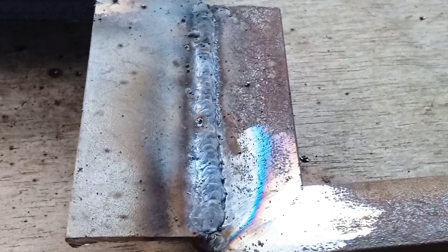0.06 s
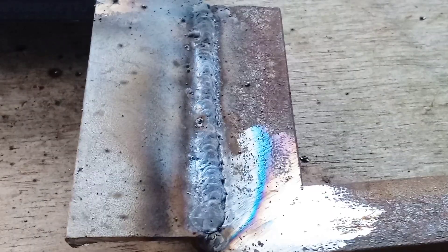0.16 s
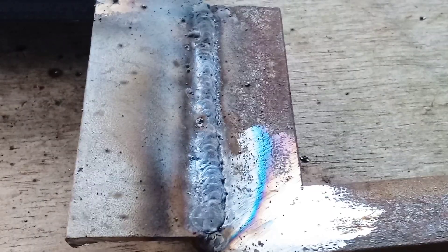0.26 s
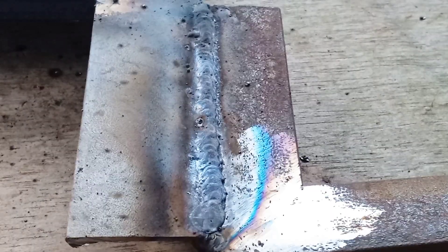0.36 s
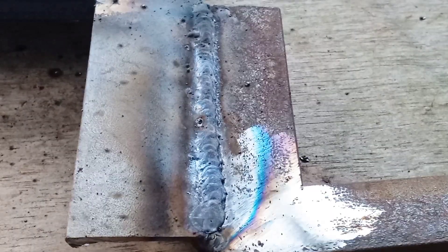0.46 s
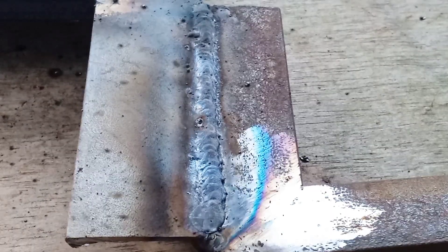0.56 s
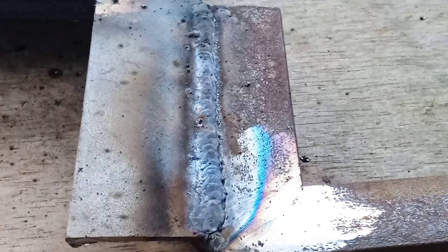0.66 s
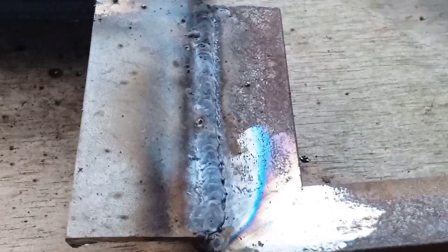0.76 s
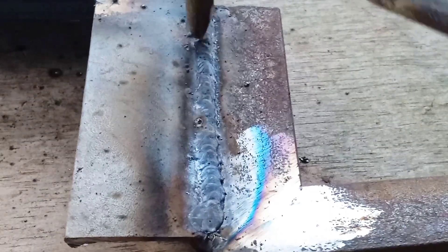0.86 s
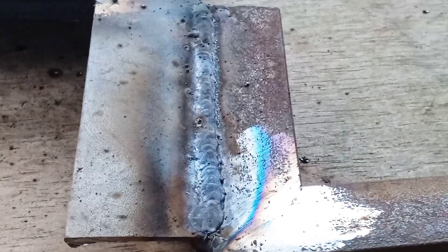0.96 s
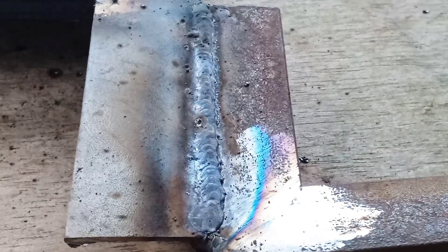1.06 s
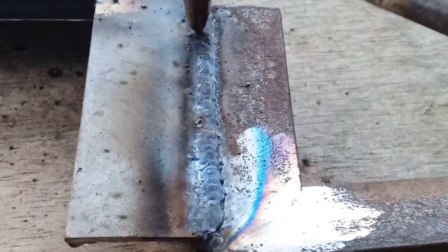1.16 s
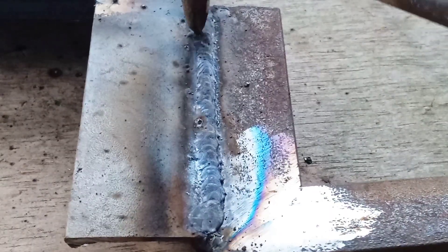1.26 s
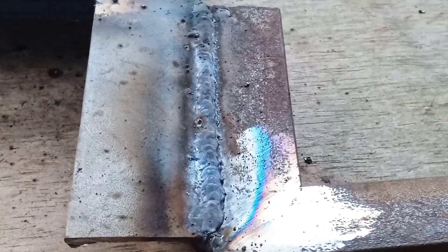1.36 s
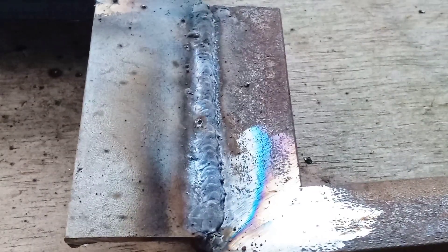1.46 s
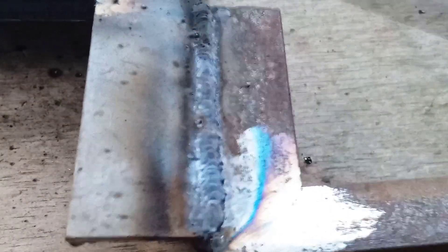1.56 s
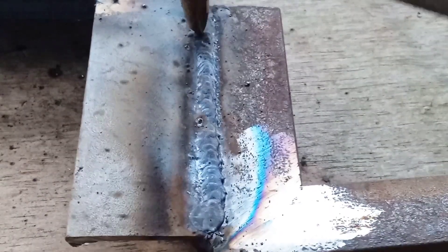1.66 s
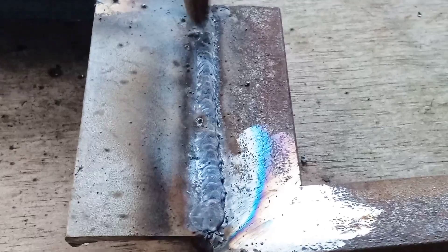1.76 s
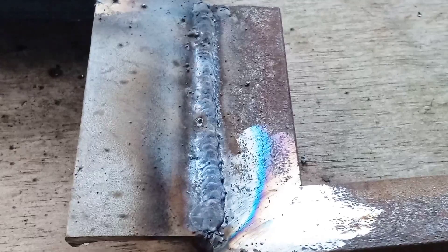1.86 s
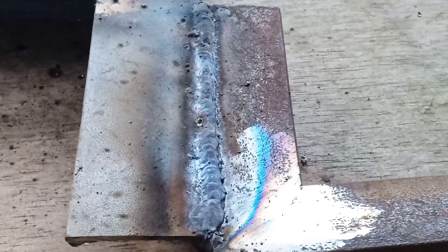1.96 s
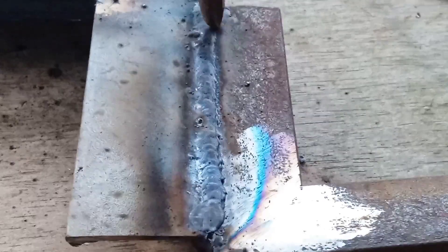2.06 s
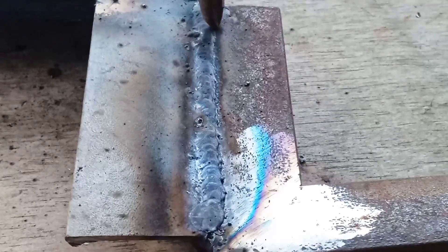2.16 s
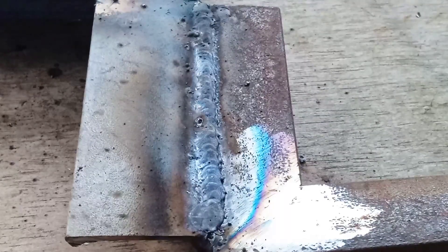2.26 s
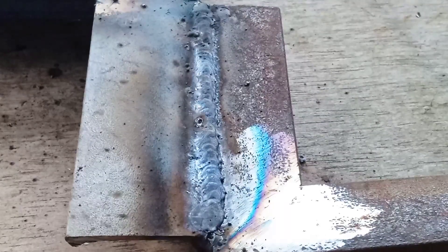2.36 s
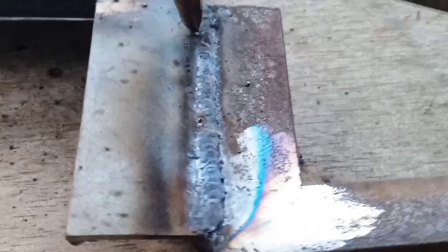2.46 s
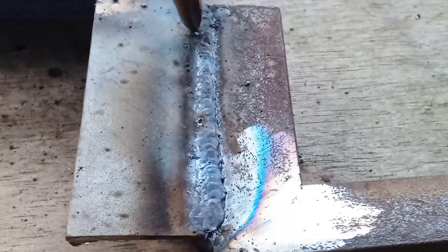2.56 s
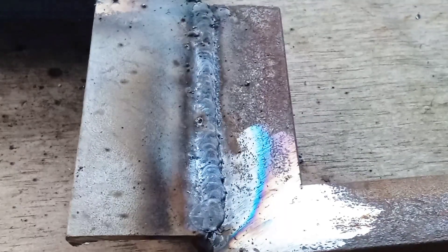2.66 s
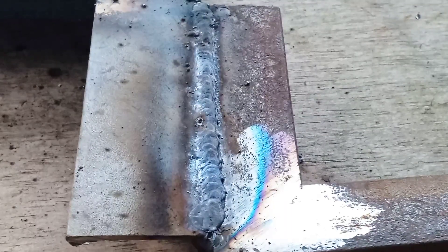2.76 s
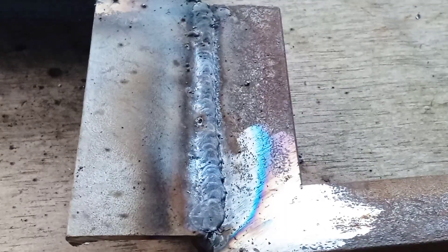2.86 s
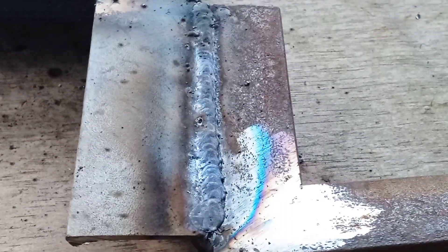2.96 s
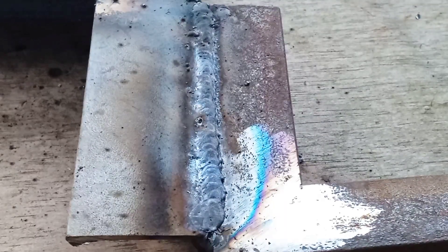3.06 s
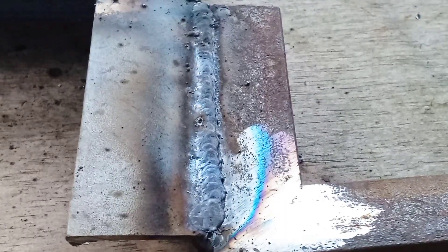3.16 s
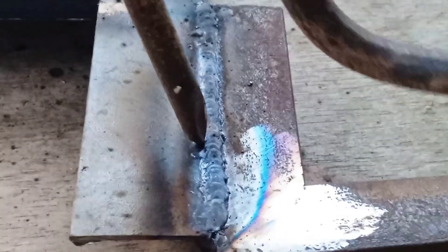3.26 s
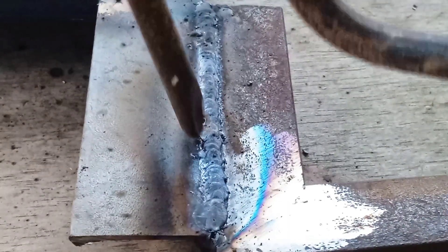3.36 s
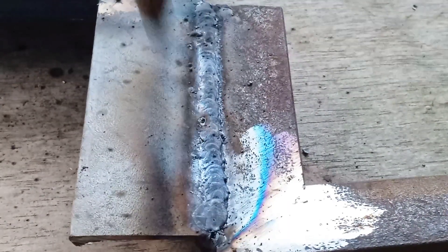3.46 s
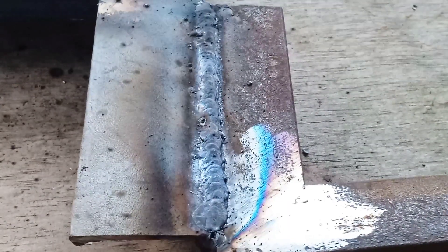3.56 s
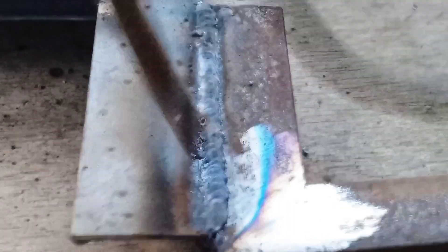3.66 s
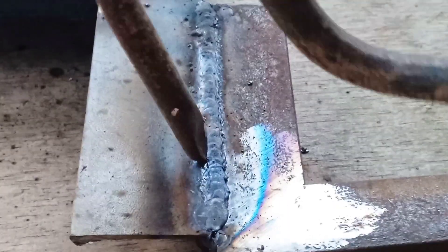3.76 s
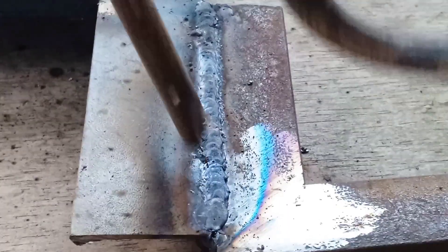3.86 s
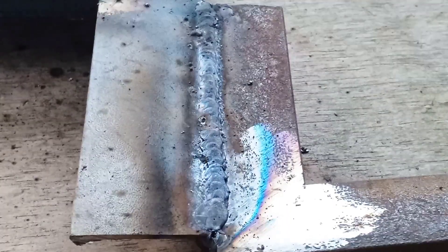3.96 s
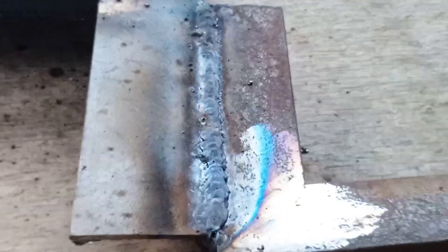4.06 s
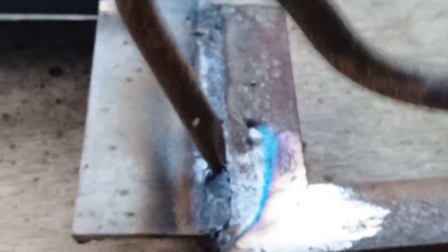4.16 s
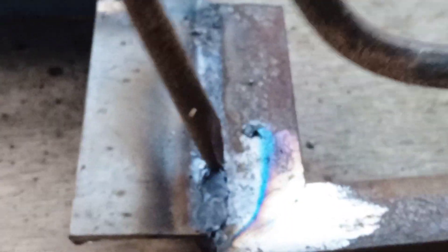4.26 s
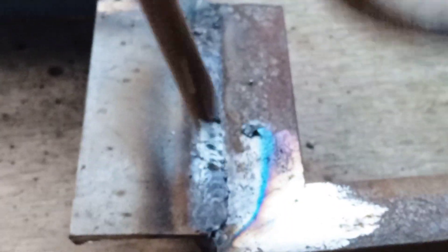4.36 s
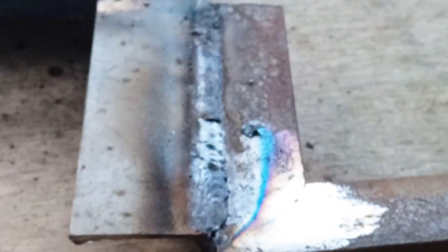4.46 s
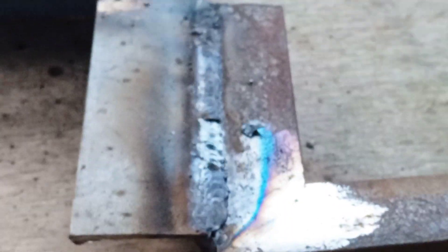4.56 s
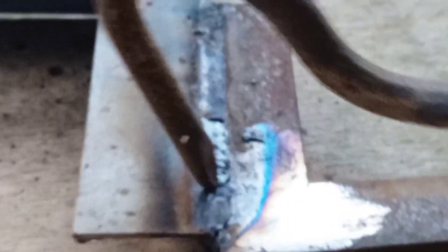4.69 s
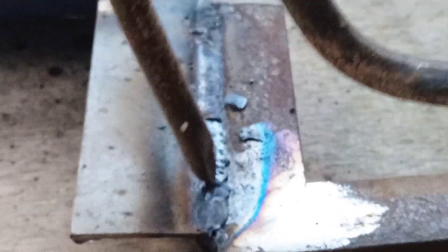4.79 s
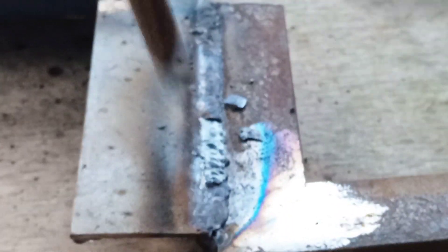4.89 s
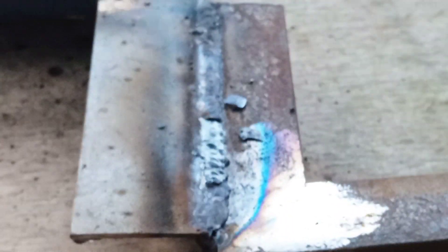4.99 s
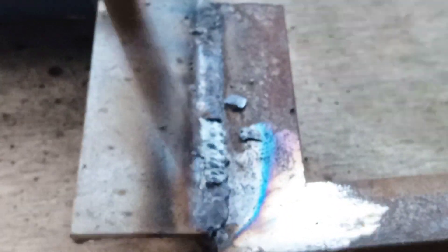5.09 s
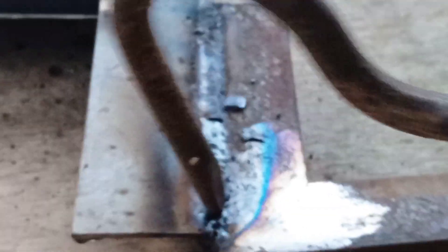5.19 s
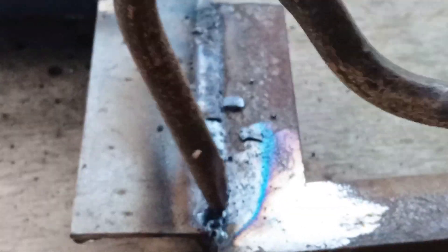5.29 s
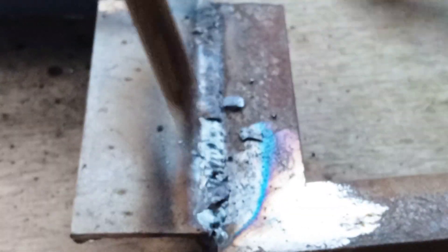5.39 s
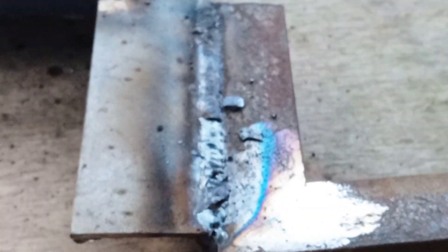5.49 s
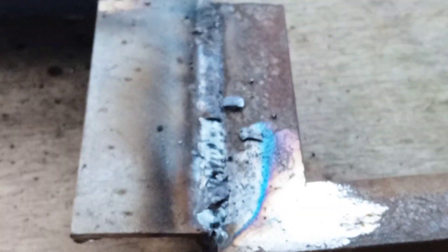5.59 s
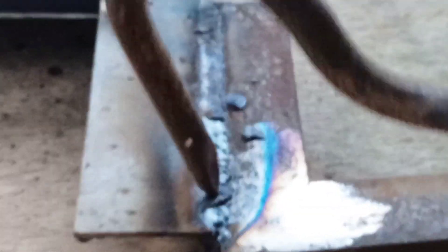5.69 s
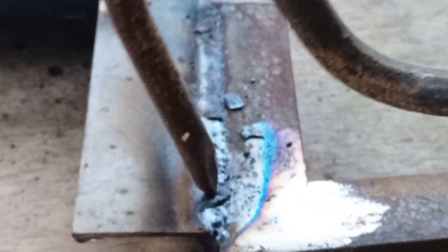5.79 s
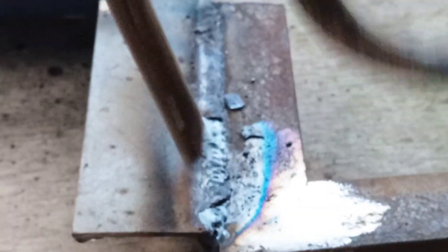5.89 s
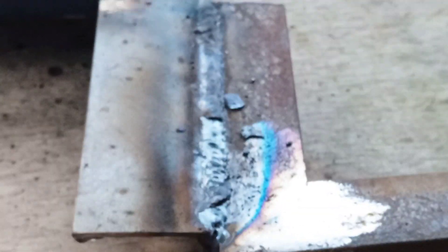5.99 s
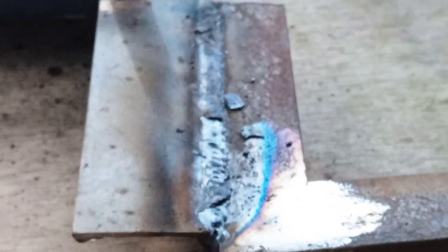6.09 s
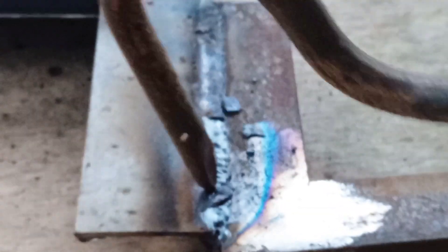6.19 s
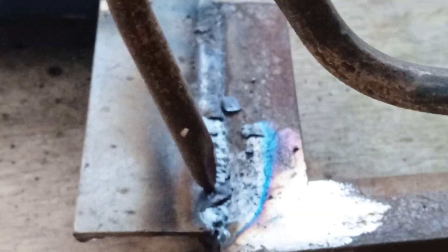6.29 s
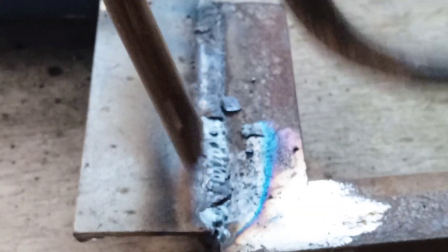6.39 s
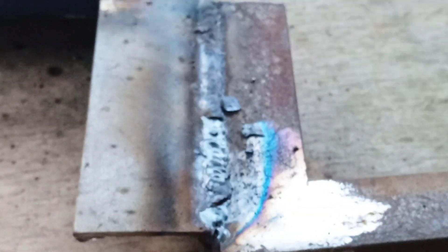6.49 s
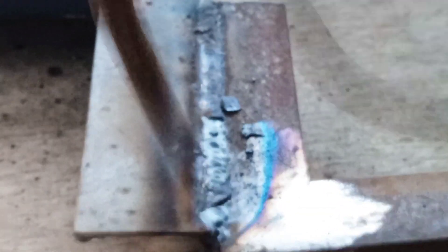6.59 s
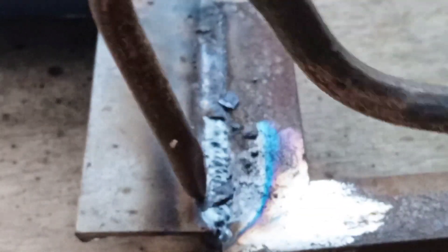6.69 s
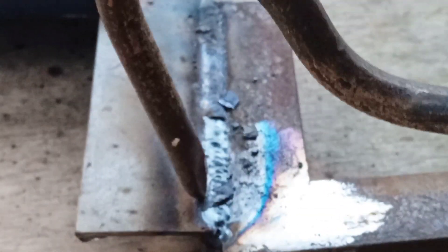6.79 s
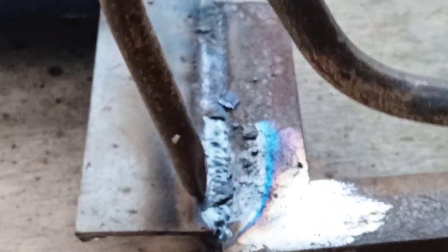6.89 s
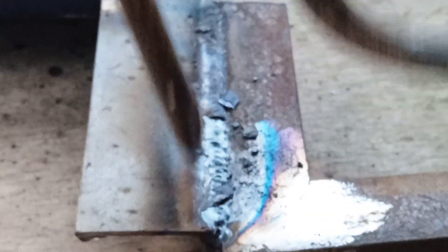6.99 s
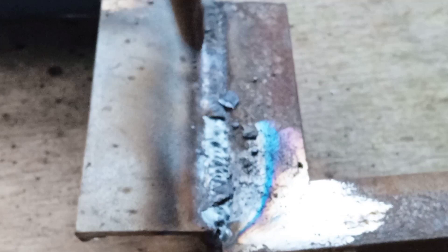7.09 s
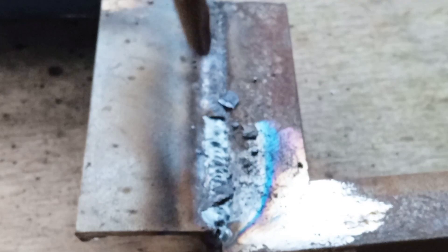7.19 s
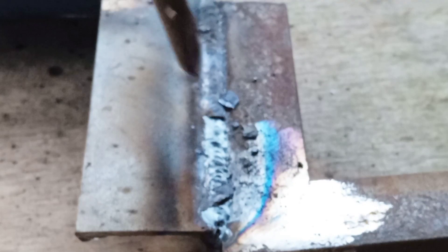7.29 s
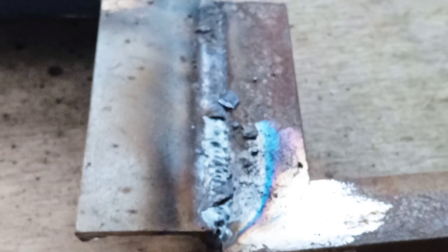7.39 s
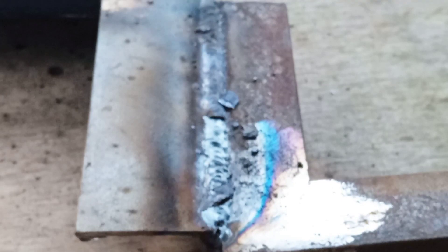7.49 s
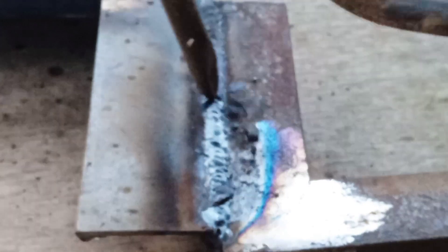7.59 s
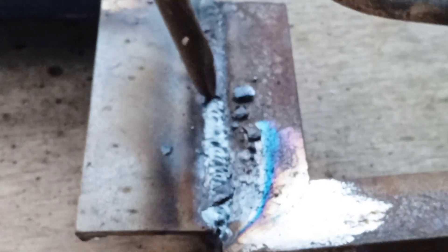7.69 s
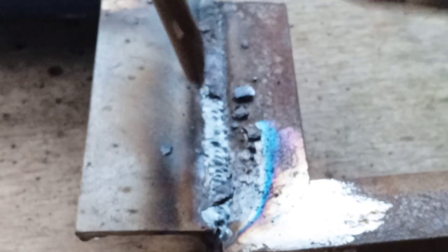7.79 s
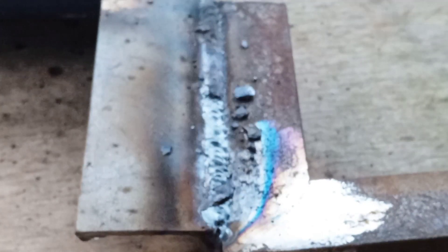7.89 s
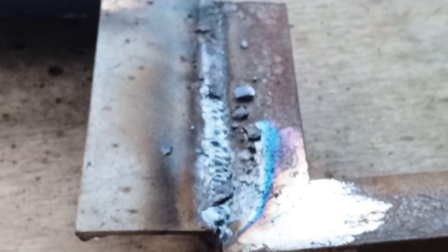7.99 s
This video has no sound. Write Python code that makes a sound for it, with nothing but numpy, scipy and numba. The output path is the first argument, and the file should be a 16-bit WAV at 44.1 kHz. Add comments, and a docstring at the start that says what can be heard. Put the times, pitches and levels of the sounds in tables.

```python
"""A workshop hums and hisses, with a faint far whine and the odd tick of a falling slag chip; then a hammer strikes.
A chipping hammer knocks slag off a weld on a steel plate that lies on a wooden bench, close to the microphone.
Each blow sums a noise crack, decaying modes of steel, hammer and bench, and a wash of crowded modes;
the spot struck sets the strength and decay of the main modes. Air is shaped noise, the hum drifting sines.
The recorder's gain control ducks each blow and lets its ring swell back."""
import sys
import numpy as np
from scipy import signal
from scipy.fft import rfft, irfft
from scipy.io import wavfile
from scipy.ndimage import uniform_filter1d, map_coordinates
from numba import njit

SR = 44100
rng = np.random.default_rng(int(sys.argv[2]) if len(sys.argv) > 2 else 0)


def transcribe(signal):
    """Save signal, clipped to [-1, 1], as a 16-bit WAV file at the path in sys.argv[1]."""
    frames = np.atleast_2d(signal).T
    limited = np.clip(frames, -1, 1)
    pcm = np.round(limited * 32767).astype(np.int16)
    wavfile.write(sys.argv[1], SR, pcm)


N = 354563

# Spectrum of workshop air and microphone hiss. Each row: frequency in Hz, relative density in dB per Hz.
AIR_SPECTRUM = [(25, -64), (55, -16), (120, -7), (330, -6.5), (520, -2), (700, -6.5), (1100, -7),
                (1400, -14.5), (1700, -10), (3600, -22), (7000, -22), (8500, -33.5), (13500, -40.5),
                (15200, -30)]
# Drifting tones of the workshop: low hum of a machine, and faint upper resonances of plate or room.
# Each row: frequency in Hz, level in dB before wavering, width (rate of drift) in Hz.
WORKSHOP_TONES = [(121, -71, 6), (158.4, -70, 17), (564.3, -61.5, 6), (1180, -72.5, 9.6), (1634, -69.5, 12)]
# Low drone of the machine. Each row: time in seconds, level in dB before the drone gain.
DRONE_LEVELS = [(0.0, -68), (1.48, -72), (1.81, -64.5), (3.78, -77), (4.7, -64), (5.06, -75), (6.31, -59),
                (6.79, -66.5), (7.54, -59), (8.04, -64.5)]
# Far whines. Each row: start in seconds, length in seconds, pitch in Hz, end pitch in Hz, level in dB;
# the pitch and level also waver.
FAR_WHINES = [(0, 0.453, 725, 690, -55), (0.739, 0.25, 645, 665, -54), (3.712, 0.47, 662, 635, -53),
              (4.331, 0.77, 554, 524, -58.5), (4.879, 0.317, 534, 565, -56.5),
              (6.456, .14, 1290, 1302, -61.5), (6.859, 0.13, 1005, 1050, -58.5)]

# Slag chips landing. Each row: time in seconds, level in dB.
CHIP_LANDINGS = [(.043, -54), (3.957, -55), (4.051, -47), (4.528, -59), (4.865, -35), (5.149, -60),
                 (5.228, -49), (5.2446, -30), (7.428, -60)]
# Spectrum of a chip's tick. Each row: frequency in Hz, relative density in dB per Hz.
CHIP_SPECTRUM = [(500, -8), (1500, -14), (4000, -10), (7000, 9), (12500, 3.5), (15500, 22.5)]

# Hammer blows. Each row: time in seconds, force in dB, spot along the weld (0 far end to 1 near end), then
# relative to the force: hammer ring in dB, high ping in dB, slag crack in dB, bench knock in dB.
HAMMER_BLOWS = [ (0.4142, -6.5, .24, 7.5, 9, -8, -6.5), (0.7742, -4.5, 0.15, 7.5, -9, -3, -0.5),
                (1.2091, -4.5, 0.14, 6, -4.5, -7, 4.5), (1.653, -1.5, 0.25, 0.5, 6, 2.5, -2.5),
                (2.091, 1.5, 0.089, 5.5, -5, 2, -1), (2.8289, .5, 0.4, 2, 1.5, 4.5, 1),
                (3.3079, -1, 0.54, -3, 4, 5.5, 2), (3.766, -1.5, .62, -12.5, -13, -1, -1.5),
                (4.281, 2, 0.67, -8.5, -2, -11, -1), (4.7728, -1.5, 0.83, -17.5, 3, 0, 2),
                (5.2865, 3, 0.79, 0, 6, 6, 0.5), (5.7609, 4, 0.87, -20, -20, -14, -3.5),
                (6.2526, 0.5, 0.84, 4.5, 2.5, -4, -1), (7.2245, 0, 0.44, -18, -22, -6.5, -3),
                (7.748, 1, 0.47, 0, 5.5, 1, 4)]
# Spectrum of the first crack of the contact. Each row: frequency in Hz, relative density in dB per Hz.
CRACK_SPECTRUM = [(40, -9.5), (300, -20), (500, -35), (900, -10), (1250, -1.5), (1700, 2.5), (2200, -5.5),
                  (3500, -1), (4500, -4), (6500, 1), (8000, -14), (13000, -26), (15500, -5.5)]
# Crowded weak modes and their wash in the workshop. Each row: frequency in Hz, relative density in dB per Hz,
# t60 in seconds.
CLANG_SPECTRUM = [(100, -19, .3), (190, -6, .3), (350, -19, .3), (800, -11, .25), (1200, -1, .24),
                  (2200, 0, .27), (2800, -11, .28), (3600, -19, .28), (4500, -7, .3), (5500, -14, .27),
                  (6700, -10, .26), (7700, -20, .22), (13000, -29, .2), (15500, -22, .21)]
# Other clear modes of plate and hammer. Each row: frequency in Hz, level in dB before scatter and colour,
# t60 in seconds.
STEEL_MODES = [(1235, -29, .24), (1624, -20.5, .22), (1806, -30, .25), (1930, -26, .24), (1962, -27, .23),
               (2154, -25, .24), (2172, -42, .6), (2897, -27, .24), (4005, -34, .29), (4300, -36, .28),
               (4346, -32, .29), (4398, -31, .3), (4522, -35, .33), (4828, -31.5, .3), (4883, -34, .27),
               (5101, -32, .21), (5852, -33, .38), (6234, -27, .29), (6818, -30, .24), (7539, -37, .22),
               (7747, -36, .25), (8018, -39, .21), (8253, -35, .2), (8751, -36, .19), (9390, -42, .2),
               (10344, -44, .23), (10880, -41, .21), (11116, -40, .22), (11310, -37, .21)]
# Plate modes that the bench damps at once, and the bench's own. Each row: frequency in Hz, level in dB before
# colour, t60 in seconds.
KNOCK_MODES = [(120, -29.5, 0.078), (148, -24, 0.05), (197, -23, 0.05), (769, -16, 0.022),
               (1246.7, -10.5, 0.078), (1945, -16.5, 0.068), (2120, -19.5, 0.072), (4357, -12.5, 0.056),
               (6407, -8, 0.034), (7370, -18.5, 0.098)]

# Band centres in Hz of a blow's deep thud, thump, knock, clang, clink, sparkle and slag crack.
BAND_CENTRES_HZ = [60, 170, 450, 1500, 4700, 9000, 14000]
# Deep thud, thump and knock of the bench. Each row: level in dB at mid weld, gain in dB from far to near end,
# growth in dB per dB of force.
BENCH_BANDS = [(-4, 7.5, 0.5), (-3.5, 5, 1.36), (-2, 5, 1.26)]

# Plate rings that change most with the spot struck; 2611 Hz has a second, better damped antinode near the
# near end. Each row: frequency in Hz, t60 in seconds at the sweet spot.
PLATE_RINGS = [(1135, .2), (2611, .56), (3121, .19), (2611, .33)]
# Where each plate ring speaks best. Each row: level in dB there, sweet spot along the weld, reach in weld
# lengths, loss in dB elsewhere, share of t60 lost elsewhere.
PLATE_SHAPES = [(-15.5, 0.596, 0.085, 6, 0.054), (-19, 0.12, 0.19, 12, 0.32), (-15.5, 0.39, 0.24, 14.5, 0),
                (-19, 0.87, 0.063, 23, 0)]
# High pings, one from the far half of the weld and one from the near half: columns as for PLATE_RINGS.
PING_RINGS = [(6080, .19), (6599, .25)]
# Where each ping speaks best: columns as for PLATE_SHAPES.
PING_SHAPES = [(-14, 0.4, 0.17, 13.6, 0), (-14.5, 0.62, 0.22, 9, .05)]
# Long rings of the hammer itself: columns as for PLATE_RINGS.
HAMMER_RINGS = [(4031, .6), (5435, .37)]
# Where each hammer ring speaks best: columns as for PLATE_SHAPES.
HAMMER_SHAPES = [(-33.5, 0.38, 0.16, 4, .2), (-19.5, 0.61, 0.18, 5.1, 0)]

AIR_DB, DRONE_GAIN_DB = -55, 2.5
CLANG_DB, CLINK_DB, SPARKLE_DB = -1.5, -2, -0.5  # middle, upper and treble bands of a full blow
CLINK_SHARE = 0.41  # dB of clink per dB of hammer ring
SPARKLE_SHARE = 0.24  # dB of sparkle per dB of slag crack
TOP_HZ = 15800  # upper band limit of the recorder
RING_T = np.arange(int(.9 * SR)) / SR  # time after an impact, in seconds


def undb(db):
    """Logarithmic level: decibels to amplitude gain."""
    return 10 ** (np.asarray(db) / 20)


def fade(t60):
    """Exponential free decay: 60 dB down after t60 seconds."""
    return np.exp(-np.log(1000) * RING_T / t60)


def across(hz, points_hz, values):
    """Interpolation of a curve on a log-frequency axis."""
    return np.interp(np.log(np.maximum(hz, 1)), np.log(points_hz), values)


def noise(points, size):
    """Spectral shaping: white noise filtered to a (Hz, dB) curve and scaled to rms 1."""
    hz, db = np.transpose(points)[:2]
    gain = undb(across(np.fft.rfftfreq(size, 1 / SR), hz, db))
    x = irfft(rfft(rng.standard_normal(size)) * gain, size)
    return x / x.std()


def walk(rate, size):
    """Slow random modulation: smooth chance of spread near 1 that changes rate times a second."""
    at = np.arange(size) / SR * rate
    knots = rng.standard_normal(int(at[-1]) + 3)
    return map_coordinates(knots, [at + rng.random()], order=2, mode="nearest")


def add(out, s, x):
    """Superposition: mix x in from time s, in seconds."""
    i = max(int(s * SR), 0)
    out[i:i + len(x)] += x[:max(N - i, 0)]


def room_air(swell_db=1):
    """Broadband noise: air and hiss with a gently swelling level."""
    return noise(AIR_SPECTRUM, N) * undb(AIR_DB + swell_db * walk(3.233, N))


def workshop_tones(waver_db=2):
    """Narrow-band tones: each sine drifts in strength and phase, which broadens its line."""
    t = np.arange(N) / SR
    out = np.zeros(N)
    for hz, db, width in WORKSHOP_TONES:
        amplitude = np.sqrt(2) * undb(db + waver_db * walk(width, N))
        out += amplitude * np.sin(2 * np.pi * hz * t + walk(2 * width, N))
    return out


def machine_drone(drone_hz=64, wobble_hz=1.21):
    """Frequency modulation: a low sine wobbles in pitch while its level rises and falls."""
    t = np.arange(N) / SR
    phase = 2 * np.pi * np.cumsum(drone_hz + wobble_hz * walk(13.0, N)) / SR
    level_db = DRONE_GAIN_DB + np.interp(t, *np.transpose(DRONE_LEVELS))
    return np.sqrt(2) * undb(level_db) * np.sin(phase)


def whine(length, hz, end_hz, waver=0.0094, flutter_db=2):
    """A gliding tone: a faint sine that swells, wavers in pitch and level, and fades."""
    size = int(length * SR)
    pitch = np.linspace(hz, end_hz, size) * (1 + waver * walk(28, size))
    swell = signal.windows.tukey(size, .4) * undb(flutter_db * walk(11.5, size))
    return swell * np.sin(2 * np.pi * np.cumsum(pitch) / SR)


def chip(tick_t60=0.022, tail_db=-17, tail_t60=0.074):
    """Brittle impact: a flake ticks on landing and the room answers with a weaker, longer decay."""
    return noise(CHIP_SPECTRUM, len(RING_T)) * (fade(tick_t60) + undb(tail_db) * fade(tail_t60))


def slag_crack(crack_db=-13, crack_t60=0.12):
    """Brittle fracture: the tip cracks the slag in a decaying noise burst."""
    return undb(crack_db) * noise(CRACK_SPECTRUM, len(RING_T)) * fade(crack_t60)


def mode_ripple():
    """Modal density: weak modes leave peaks and valleys, the same for every blow and deepest in the treble."""
    hz = np.fft.rfftfreq(len(RING_T), 1 / SR)
    depth_db = across(hz, [600, 1300, 7200, 8500], [2, 5, 6, 9])
    peaks = np.repeat(np.clip(rng.standard_normal(len(hz)), -2, 2), 12)[:len(hz)]
    power = undb(depth_db * peaks) ** 2
    return np.sqrt(power / uniform_filter1d(power, size=900))  # keeps the local mean power


def clang(ripple):
    """Frequency-dependent damping: modes too crowded to tell apart, each octave dying at its own pace."""
    size = len(RING_T)
    points_hz, _, t60 = np.transpose(CLANG_SPECTRUM)
    spectrum = rfft(noise(CLANG_SPECTRUM, size)) * ripple
    octave = np.round(np.log2(np.maximum(np.fft.rfftfreq(size, 1 / SR), 2 ** 6)))
    out = np.zeros(size)
    for k in np.unique(octave):
        band = irfft(spectrum * (octave == k), size)
        out += band * fade(across(2 ** k, points_hz, t60))
    return out


def ring(hz, t60, beat_rate=22, build_s=0.0066):
    """Damped mode: as reflections build up they beat against its direct sound."""
    knots = np.arange(64) / beat_rate
    in_phase, quadrature = (np.interp(RING_T, knots, c) for c in rng.standard_normal((2, len(knots))))
    room = .25 * (1 - np.exp(-RING_T / build_s))
    phase = (2 * np.pi * (hz * RING_T + rng.random())).astype(np.float32)
    return fade(t60) * ((1 + room * in_phase) * np.sin(phase) + room * quadrature * np.cos(phase))


def steel_ring(scatter_db=2.5):
    """Modal superposition: clear modes of plate and hammer, their levels scattered from blow to blow."""
    return sum(undb(db + scatter_db * rng.standard_normal()) * ring(hz, t60) for hz, db, t60 in STEEL_MODES)


def bench_knock(give_s=0.0025):
    """Inertia and damping: short modes that build up late, as the heavy plate takes a moment to move."""
    give = 1 - np.exp(-RING_T / give_s)
    return give * sum(undb(db) * ring(hz, t60) for hz, db, t60 in KNOCK_MODES)


def band_levels(force_db, spot, hammer_db, slag_db, bench_db):
    """Excitation spectrum: bench answers force and spot, clink follows hammer, the top is breaking slag."""
    bench = [db + bench_db + slope_db * (spot - .5) + growth * force_db for db, slope_db, growth in BENCH_BANDS]
    upper = [CLANG_DB, CLINK_DB + CLINK_SHARE * hammer_db, SPARKLE_DB + SPARKLE_SHARE * slag_db, slag_db]
    return bench + [force_db + db for db in upper]


def tint(x, colour_db):
    """Causality: a minimum-phase filter colours the blow, so nothing sounds before the contact."""
    size = 2 ** 16
    gain = undb(across(np.fft.rfftfreq(size, 1 / SR), BAND_CENTRES_HZ, colour_db))
    # folding the cepstrum onto positive times gives the minimum phase
    cepstrum = irfft(np.log(gain))
    cepstrum[1:size // 2] *= 2
    cepstrum[size // 2 + 1:] = 0
    return irfft(rfft(x, size) * np.exp(rfft(cepstrum)))[:len(x)]


def at_spot(modes, shapes, spot, strength_db):
    """Mode shape: (Hz, t60, dB) rows, full near their sweet spot, weaker and often shorter elsewhere."""
    struck = []
    for (hz, t60), (db, sweet_spot, reach, loss_db, damping) in zip(modes, shapes):
        missed = 1 - np.exp(-((spot - sweet_spot) / reach) ** 4)
        struck.append((hz, t60 * (1 - damping * missed), db + strength_db - loss_db * missed))
    return struck


def main_rings(force_db, spot, hammer_db, ping_db):
    """Selective excitation: the spot picks the modes; the hammer rings as freely as it rebounds."""
    return (at_spot(PLATE_RINGS, PLATE_SHAPES, spot, force_db)
            + at_spot(PING_RINGS, PING_SHAPES, spot, force_db + ping_db)
            + at_spot(HAMMER_RINGS, HAMMER_SHAPES, spot, force_db + hammer_db))


def blow(colour_db, rings, ripple, clang_db=-19.0, main_db=-2):
    """Impact response: the slag cracks, the plate knocks on the bench and the steel rings on."""
    body = slag_crack() + undb(clang_db) * clang(ripple) + steel_ring() + bench_knock()
    main = sum(undb(db) * ring(hz, t60) for hz, t60, db in rings)
    return tint(body, colour_db) + undb(main_db) * main


def scene():
    """Superposition of workshop, whines, falling chips and blows."""
    out = room_air() + workshop_tones() + machine_drone()
    for s, length, hz, end_hz, db in FAR_WHINES:
        add(out, s, undb(db) * whine(length, hz, end_hz))
    for s, db in CHIP_LANDINGS:
        add(out, s, undb(db) * chip())
    ripple = mode_ripple()
    for s, force_db, spot, hammer_db, ping_db, slag_db, bench_db in HAMMER_BLOWS:
        colour_db = band_levels(force_db, spot, hammer_db, slag_db, bench_db)
        rings = main_rings(force_db, spot, hammer_db, ping_db)
        add(out, s, blow(colour_db, rings, ripple))
    return out[None]


@njit
def follow(x, attack, release):
    """Envelope detection: a level follower that rises fast and sinks slowly."""
    level, e = np.empty(len(x)), 0.
    for i in range(len(x)):
        e += (abs(x[i]) - e) * (attack if abs(x[i]) > e else release)
        level[i] = e
    return level


def record(dry, knee_db=-23.0, attack_s=0.0036, release_s=0.02, squeeze=0.6, low_cut_hz=50):
    """Compression and band limiting: gain ducks above the knee, peaks are rounded, deep bass and top are cut."""
    level = follow(dry[0], 1 / (attack_s * SR), 1 / (release_s * SR))
    held = dry * np.maximum(level / undb(knee_db), 1) ** -squeeze  # squeeze: dB ducked per dB above the knee
    ceiling = .45
    rounded = ceiling * np.tanh(held / ceiling)
    high_pass = signal.butter(N=4, Wn=low_cut_hz, btype="high", fs=SR, output="sos")
    low_pass = signal.ellip(10, .2, 80, TOP_HZ, fs=SR, output="sos")
    return signal.sosfilt(np.vstack([high_pass, low_pass]), rounded)


dry = scene()
out = record(dry)
transcribe(out)
```